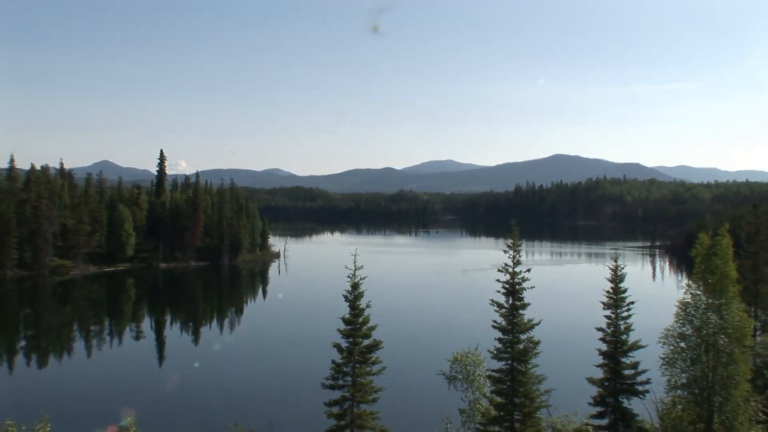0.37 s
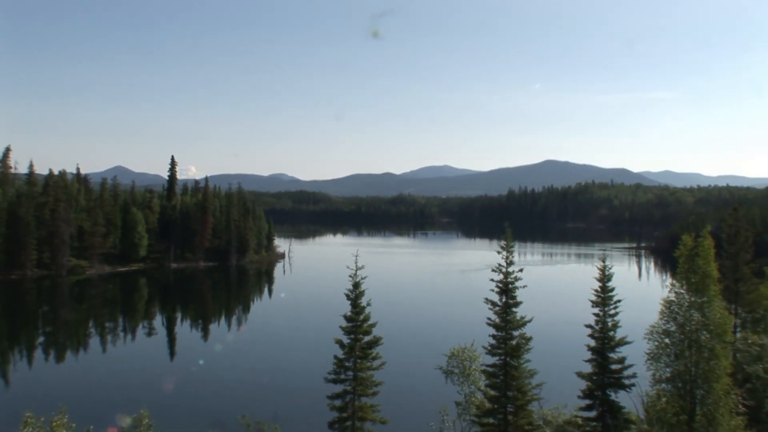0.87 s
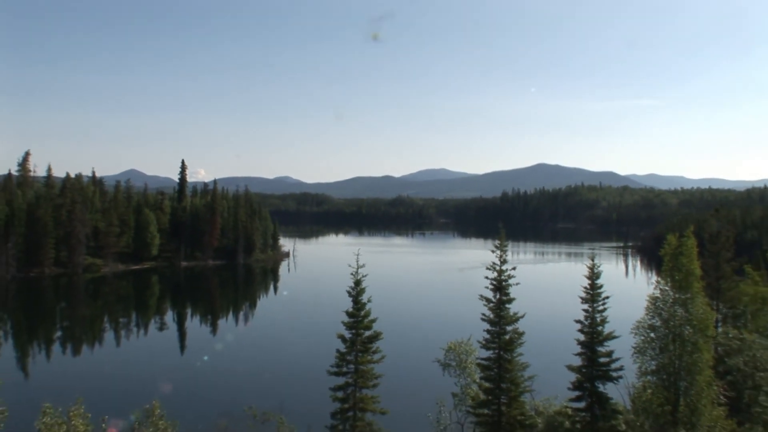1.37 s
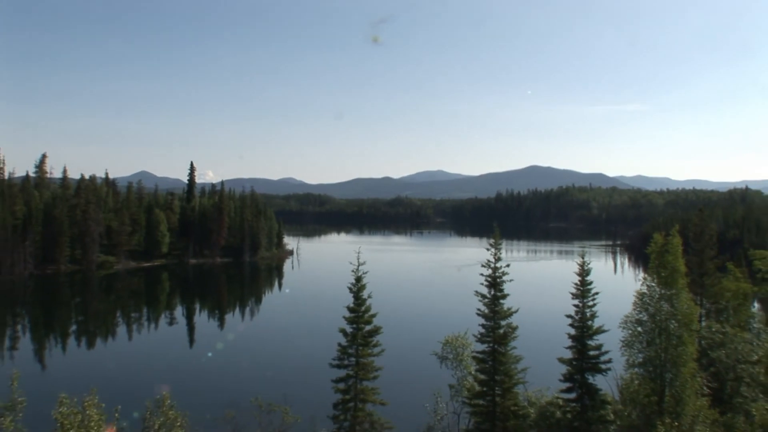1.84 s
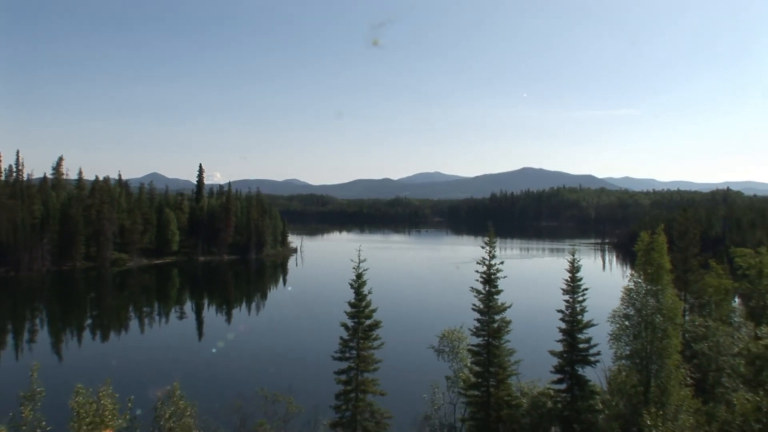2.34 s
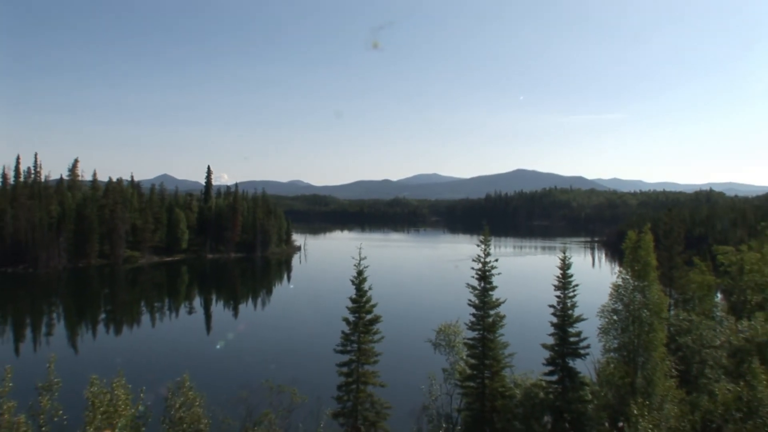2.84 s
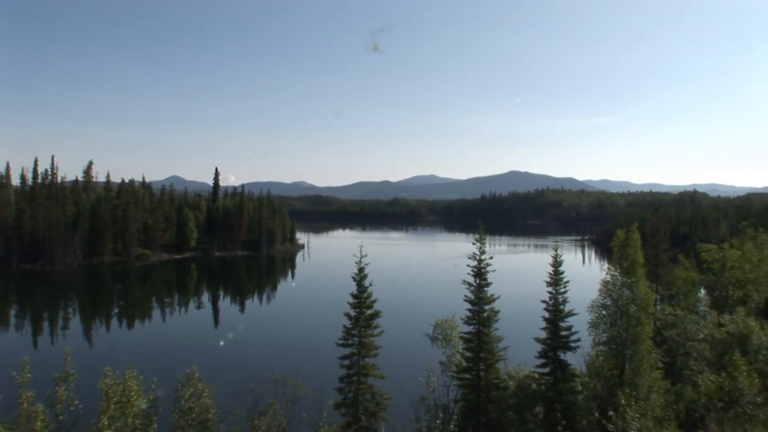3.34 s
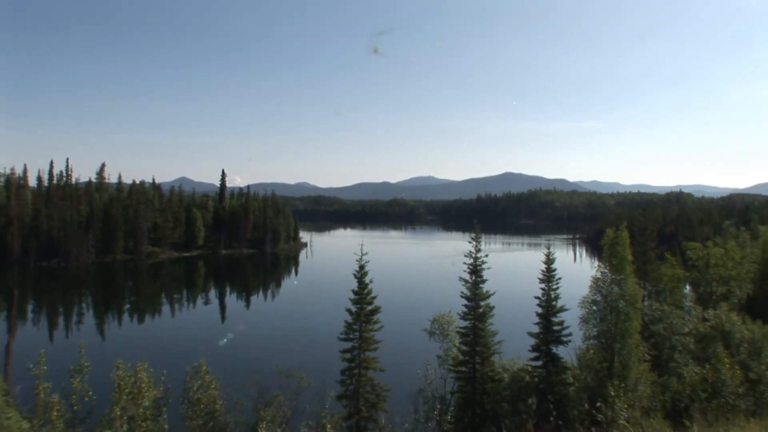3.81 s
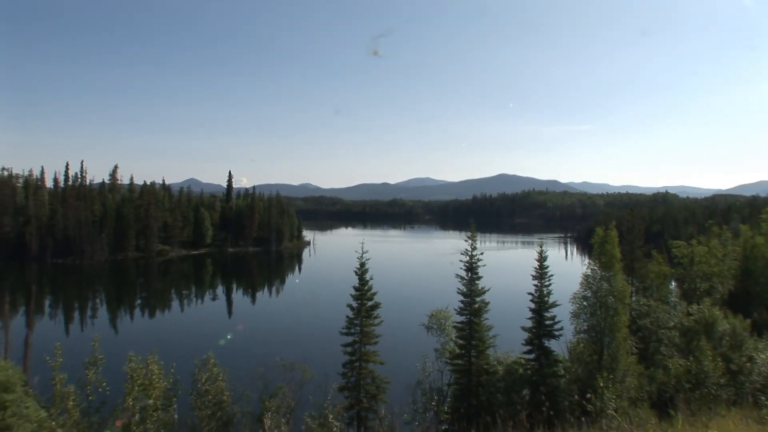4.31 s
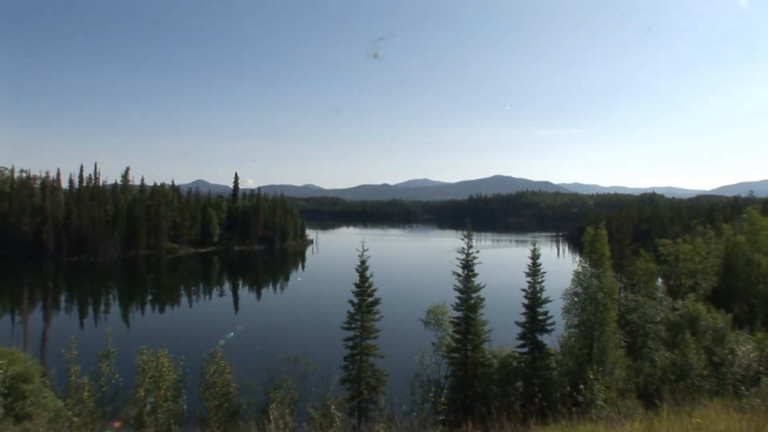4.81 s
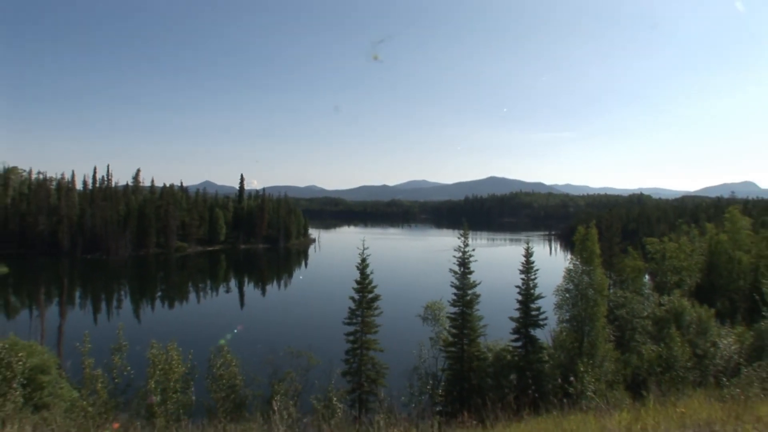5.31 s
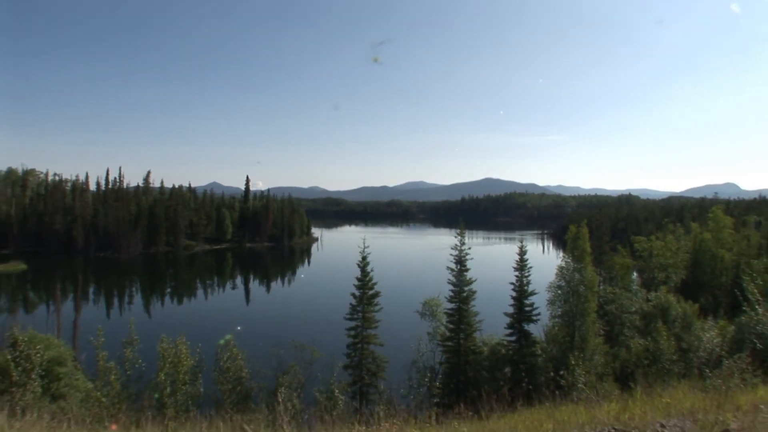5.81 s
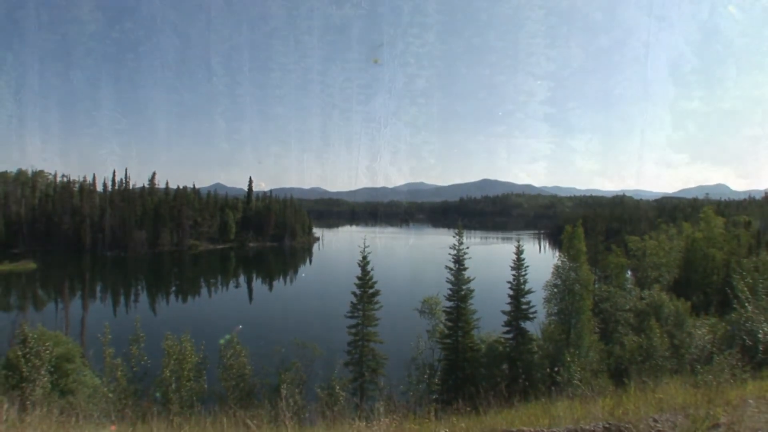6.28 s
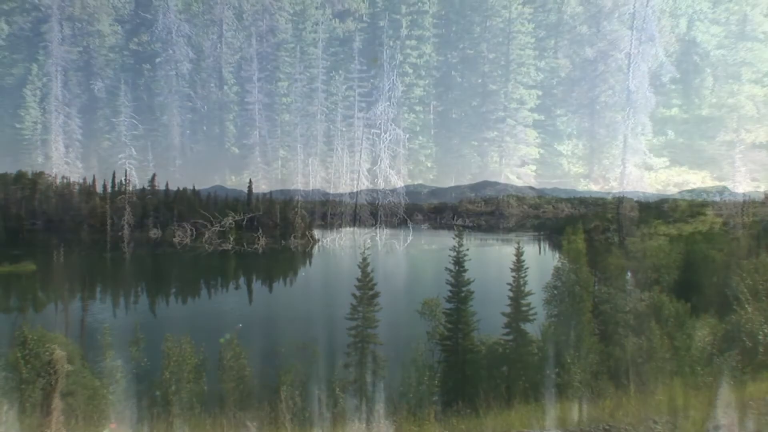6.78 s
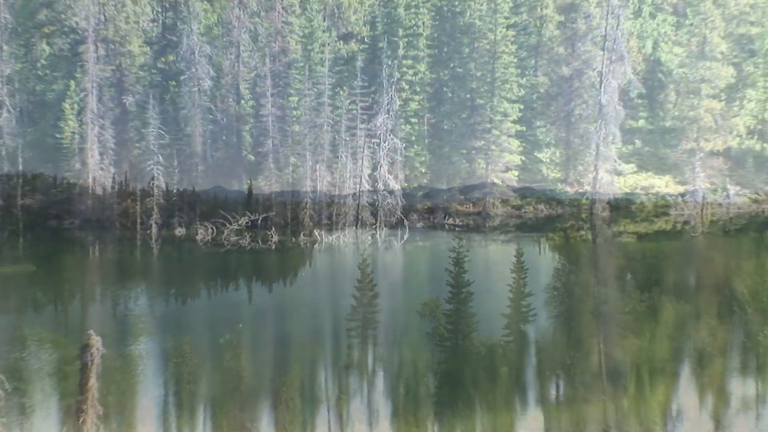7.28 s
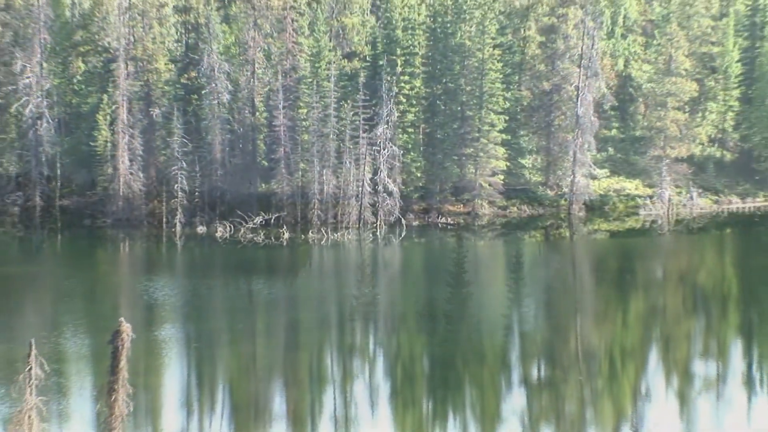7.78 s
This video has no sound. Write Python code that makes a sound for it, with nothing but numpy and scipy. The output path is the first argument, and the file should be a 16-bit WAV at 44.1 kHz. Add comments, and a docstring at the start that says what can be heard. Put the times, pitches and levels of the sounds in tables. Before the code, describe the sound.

A car engine hums low and throbs while tyres crunch over gravel, then cuts off abruptly as songbirds, a distant cuckoo and wind carry on.

```python
"""Songbirds and a far cuckoo sing in echoing woods: gliding tones, some swung into trills and buzzes.
A car coasts over gravel: its six-cylinder engine, a sum of cycle orders, slows and throbs in the exhaust.
Stones snap under the tyres as ringing bursts, over random grit, sand and tyre roar made of shaped noise.
The car's sound is cut off abruptly; wind, a lumpy low noise, buffets the microphone and the birds sing on."""
import sys
import numpy as np
from scipy import signal
from scipy.fft import rfft, irfft, next_fast_len
from scipy.io import wavfile
from scipy.ndimage import uniform_filter1d, map_coordinates

SR = 44100
rng = np.random.default_rng(int(sys.argv[2]) if len(sys.argv) > 2 else 0)


def log_audio(samples):
    """Write samples as a 16-bit WAV file to the path given in sys.argv[1]."""
    # one column per channel
    frames = np.atleast_2d(samples).T
    # limit to full scale, then quantise
    limited = np.clip(frames, -1, 1)
    pcm = np.round(limited * 32767).astype(np.int16)
    wavfile.write(sys.argv[1], SR, pcm)


def voltage_ratio(decibels):
    """Convert decibels (scalar or array-like) to amplitude ratios, 20 dB per decade."""
    exponent = np.asarray(decibels, float) / 20
    return 10 ** exponent


N = 347949
SAMPLES_S = np.arange(N) / SR
TOP_HZ = 14450

# Wind buffet spectrum: frequency_hz, relative_db
BUFFET_SPECTRUM = [(6, -35), (12, -2), (30, -8.5), (60, -7), (120, -26), (300, -39.5), (600, -65)]
# Gust peaks: peak_s, level_db
GUSTS = [(1.15, -37), (3.5, -29), (3.78, -26), (3.97, -26.5), (4.79, -21), (5.34, -24.5), (5.82, -22),
         (6.4, -24), (6.65, -21), (6.87, -22), (7.03, -24), (7.25, -30), (7.85, -27)]
BREEZE_DB = -38.5  # buffeting between gusts
GUST_RISE_DB_PER_S, GUST_FALL_DB_PER_S = 49, 47
# Outdoor hiss spectrum: frequency_hz, relative_db
HISS_SPECTRUM = [(53, -33), (90, -3), (174, -11.5), (358, -13.5), (911, -17.5), (1450, -21.5), (2520, -27),
                 (3060, -25.5), (4030, -32), (5540, -31), (12900, -35.5), (14400, -42)]

# Engine speed: time_s, cycles_per_s
ENGINE_SPEED = [(0.0, 11.98), (0.7, 11.579), (1.4, 11.275), (2.1, 11.05), (2.8, 10.832), (3.5, 10.574),
                (4.2, 10.328), (4.9, 10.12), (5.6, 9.871), (6.3, 9.492), (7.13, 8.998)]
# Engine levels: time_s, firing_tone_db, exhaust_throb_gain_db
ENGINE_LEVELS = [(0, -24, -35), (2.12, -23, -34.5), (3.2, -26, -33.5), (3.5, -27, -33.5), (5.7, -28.5, -32),
                 (7.12, -30.5, -30)]
# Cylinder unevenness, last value holding above: order_of_cycle, relative_db
CYLINDER_UNEVENNESS = [(13, -25), (14, -2.5), (15, 1.5), (16, -2), (17, -10.5), (18, -9.5), (20, -12.5),
                       (22, -8)]
# Exhaust resonances: centre_hz, width_hz, gain_db
EXHAUST_MODES = [(153, 13, 4), (245, 20, -10), (365, 18, -22)]
# Octave of the firing tone
OCTAVE_DB, OCTAVE_FADE_DB_PER_S, OCTAVE_LEAST_DB = -26.5, 3.5, -47.5
RASP_DB_PER_CYCLE = 3  # upper orders grow with each cycle per second above ten
CAR_END_S = 7.125

# Sand sprays: peak_s, level_db
SPRAYS = [(.03, -49), (.62, -49), (.76, -50), (.95, -49), (1.55, -52), (1.7, -49), (2.06, -48), (2.52, -52)]
SPRAY_RISE_DB_PER_S, SPRAY_FALL_DB_PER_S = 250, 100
# Sand resonances, each pass: centre_hz, width_hz, gain_db
SAND_MODES = [(5760, 740, 0.5), (12500, 3000, 0)]

# Tyre roar spectrum: frequency_hz, relative_db
ROAR_SPECTRUM = [(30, -35), (60, 13), (150, 13), (260, 10), (420, -2.5), (750, -3.5), (1000, -1.5),
                 (1350, -2), (1700, -6.5), (3500, -14.5), (8000, -23), (12500, -22.5), (14500, -26)]
# Tyre roar, left-right likeness: frequency_hz, likeness
ROAR_LIKENESS = [(60, 0.91), (250, 0.42), (600, 0.011), (3000, 0.088)]
# Single stones: start_s, relative_level_db, relative_treble_db, left_over_right_db
STONES = [(0.0857, -36, -18, 0.5), (0.277, -34, -13, 8), (0.3546, -36, -17, 2.5), (0.3785, -33, -23, 9),
          (0.4145, -29, -29, 6), (0.4359, -27.5, -16, 9), (0.518, -29.5, -10, 8), (0.5886, -44, -17, 0.5),
          (0.669, -33, -24, 6), (0.826, -34.5, -5.5, 22), (1.081, -34, -18, 7), (1.096, -29.5, -27, 15),
          (1.1291, -24, -28, -3), (1.191, -22.5, -12, -2), (1.5229, -39, -7, 7), (1.8906, -31, -19, 10),
          (1.923, -16, -33, 0.5), (2.0281, -11, -36, -2), (2.0435, -11.5, -31, -3), (2.5085, -27, -31, 17),
          (2.522, -26.5, -31, 23), (2.5712, -31, -26, 14), (2.657, -27, -21, -2.0), (3.3454, -34, -20, -5),
          (4.0787, -34, -22, 6), (4.987, -29, -28, -0.5), (4.9924, -23, -23, -2.0), (5.012, -22, -34, -2.5),
          (5.042, -26, -31, 0), (5.0476, -15, -45, -1)]
# Dull body of a snap: centre_hz, width_hz, relative_db
SNAP_BODY_MODES = [(1300, 600, -1), (2200, 800, 0), (3200, 900, -6)]
# Bright edge of a snap: centre_hz, width_hz, relative_db
SNAP_EDGE_MODES = [(4500, 1200, 0.5), (12300, 1600, -3.5)]
# Patches of loose grit: peak_s, level_db
LOOSE_GRIT = [(0, -43), (.85, -40.5), (2, -41), (2.55, -40), (4.99, -57)]
GRIT_DB, GRIT_THIN_DB_PER_S = -55.5, 1  # small grit, less as the car slows
LOOSE_RISE_DB_PER_S, LOOSE_FALL_DB_PER_S = 58, 43
ROAR_DB = -35

# Left bird's glides: start_s, end_s, first_hz, last_hz, relative_db
LEFT_GLIDES = [ (.728, .75, 4760, 4330, -44), (.75, .812, 4300, 4210, -45.5), (.814, .864, 4100, 3510, -43),
               (.864, .9, 3470, 3720, -46), (.978, 1.0, 4000, 3190, -40), (1.0, 1.08, 3140, 3030, -44),
               (1.112, 1.16, 3420, 3110, -36), (1.16, 1.235, 3100, 3080, -42),
               (1.243, 1.272, 3900, 3186, -34), (1.272, 1.33, 3180, 3550, -35.5),
               (1.33, 1.39, 3540, 3553, -40), (1.515, 1.55, 2850, 2980, -47),
               (1.55, 1.65, 2980, 2750, -41.5), (1.705, 1.73, 3000, 2520, -40),
               (1.868, 1.92, 2620, 3130, -39), (1.92, 1.955, 3120, 3200, -40.5),
               (1.955, 2.02, 3190, 2990, -40), (2.303, 2.322, 2650, 2760, -40),
               (2.7, 2.735, 3150, 2900, -48), (2.752, 2.775, 2930, 2350, -44.5)]
# Glides of the birds ahead: start_s, end_s, first_hz, last_hz, relative_db
AHEAD_GLIDES = [ (2.06, 2.19, 2160, 2175, -46), (2.207, 2.245, 2850, 2100, -35),
                (2.263, 2.329, 2110, 2274, -36), (2.44, 2.474, 2660, 2500, -40),
                (2.474, 2.515, 2500, 2680, -33), (2.515, 2.565, 2680, 2430, -35),
                (2.59, 2.67, 3370, 3430, -43), (2.67, 2.7, 3410, 3150, -41.5),
                (2.873, 2.9, 2650, 2450, -40), (2.9, 2.945, 2480, 2590, -39.5),
                (2.945, 2.967, 2540, 2930, -36), (2.993, 3.02, 3070, 2680, -40),
                (3.02, 3.063, 2700, 2574, -36), (3.063, 3.1, 2590, 3030, -43),
                (3.1, 3.145, 3100, 2440, -43), (4.045, 4.072, 2180, 2210, -40),
                (4.072, 4.087, 2210, 2040, -42), (4.159, 4.197, 2680, 3100, -38),
                (4.205, 4.23, 3050, 2630, -40), (4.335, 4.392, 2380, 2516, -35),
                (4.518, 4.546, 2510, 2100, -39.5), (4.622, 4.65, 2720, 3150, -35),
                (4.663, 4.686, 3200, 2680, -36), (4.8, 4.885, 2400, 2620, -37),
                (5.36, 5.446, 2610, 2430, -53), (5.62, 5.66, 6300, 5240, -52),
                (5.446, 5.5, 2430, 2266, -40.5), (5.5, 5.655, 2247, 2170, -38),
                (5.655, 5.685, 2450, 2200, -38), (5.757, 5.781, 2180, 2410, -45),
                (5.781, 5.86, 2300, 2180, -38.5), (5.87, 5.935, 2250, 2840, -35),
                (5.935, 6.026, 2840, 2730, -38), (5.845, 5.89, 3350, 3260, -44),
                (5.931, 5.96, 3500, 3300, -41), (5.96, 6.02, 3400, 3650, -42),
                (6.028, 6.06, 2730, 2520, -40), (6.062, 6.125, 2860, 2526, -35.5),
                (6.125, 6.17, 2517, 2480, -30.5), (6.17, 6.21, 2490, 2400, -36),
                (6.095, 6.115, 3300, 3270, -40), (6.146, 6.258, 2906, 2950, -40.5),
                (6.252, 6.286, 2600, 2440, -46), (6.286, 6.318, 2480, 2810, -34.5),
                (6.385, 6.413, 2650, 2270, -37), (6.415, 6.493, 2240, 2125, -37),
                (6.699, 6.745, 4060, 4550, -43.5), (6.858, 6.898, 4630, 4240, -43.5),
                (7.092, 7.118, 4200, 4500, -45), (7.148, 7.165, 4020, 4400, -47),
                (7.2, 7.269, 4060, 3850, -47), (7.236, 7.255, 5300, 5000, -44),
                (7.255, 7.283, 5000, 4150, -37.5), (7.355, 7.395, 3420, 4000, -43),
                (7.395, 7.478, 3980, 4230, -37.5), (7.425, 7.447, 7600, 7150, -48),
                (7.447, 7.465, 7150, 6500, -40), (7.637, 7.65, 3770, 4600, -38),
                (7.65, 7.66, 4680, 3520, -41), (7.682, 7.708, 3330, 4400, -39),
                (7.708, 7.736, 4320, 4980, -30), (7.868, 7.89, 5200, 4900, -52)]
# Right bird's glides: start_s, end_s, first_hz, last_hz, relative_db
RIGHT_GLIDES = [ (5.472, 5.62, 2950, 2720, -41), (5.625, 5.7, 2910, 2690, -40.5),
                (5.7, 5.775, 2700, 2590, -41.5), (5.893, 5.933, 2310, 2220, -40),
                (5.895, 5.925, 2980, 2890, -40), (6.11, 6.15, 2550, 2320, -39),
                (6.15, 6.21, 2320, 2230, -34), (6.334, 6.405, 2654, 2654, -37),
                (6.405, 6.45, 2667, 2515, -32.5), (6.45, 6.565, 2530, 2468, -30),
                (6.64, 6.69, 2680, 2580, -41), (6.69, 6.71, 2570, 2800, -34),
                (6.672, 6.715, 3000, 2826, -38), (6.715, 6.82, 2815, 2697, -33),
                (6.934, 7.04, 3105, 2760, -37.5), (7.04, 7.064, 2750, 2840, -34.5),
                (7.074, 7.108, 2920, 2550, -40), (7.108, 7.17, 2590, 2590, -40),
                (7.17, 7.26, 2590, 2600, -47), (7.271, 7.37, 2600, 2235, -37),
                (7.385, 7.455, 2240, 2255, -47), (7.57, 7.615, 2620, 2370, -50),
                (7.615, 7.704, 2360, 2180, -40), (7.671, 7.745, 2630, 2280, -34),
                (7.68, 7.718, 2930, 2660, -38), (7.718, 7.85, 2630, 2620, -40)]
BEND = 1.6  # above 1 a glide moves fast first, then settles
PEAK_SHARE = 0.44  # loudest point as a share of the glide
# Drop below the peak at start, at end, and at an end slurred to a neighbour
ONSET_DB, FADE_DB, SLUR_DB = 6, 6.5, 2
# Buzzy notes: start_s, end_s, first_hz, last_hz, relative_db
BUZZ_NOTES = [(1.72, 1.892, 3140, 3510, -40.5), (2.41, 2.488, 3610, 3420, -38.5),
              (2.486, 2.629, 3570, 3250, -43)]
# Faint hoarse notes: start_s, end_s, first_hz, last_hz, relative_db
HUSKY_NOTES = [(.94, .99, 6150, 6050, -43), (1.47, 1.53, 5250, 5150, -51), (2.065, 2.13, 4600, 4600, -42),
               (2.13, 2.32, 4580, 4550, -53)]
# Chirrs: start_s, end_s, first_hz, last_hz, relative_db
CHIRR_NOTES = [(7.457, 7.481, 4900, 4800, -27), (7.553, 7.592, 6060, 4600, -32),
               (7.811, 7.862, 6340, 4400, -34.5)]
# Warbled glides: start_s, end_s, first_hz, last_hz, relative_db
TRILL_NOTES = [(4.228, 4.348, 2447, 2327, -32.5), (4.686, 4.806, 2466, 2320, -33)]
# A small bird's short arches: top_s, top_hz, relative_db
CHIP_TOPS = [(4.142, 2550, -50), (4.155, 2500, -38), (4.605, 2650, -52), (4.62, 2600, -43),
             (5.31, 4900, -46), (5.333, 4650, -48), (5.375, 4300, -44), (5.4, 4050, -46), (5.42, 4050, -48),
             (5.563, 4300, -37.5), (5.59, 4250, -46), (5.643, 5000, -41), (5.66, 4750, -44),
             (5.68, 4600, -40), (5.7, 4400, -40), (5.718, 4250, -47), (5.738, 4050, -41),
             (5.862, 4200, -43), (5.878, 4300, -37), (5.927, 4880, -36), (5.945, 4680, -35.5),
             (5.964, 4560, -35.5), (5.985, 4000, -37), (6.072, 4000, -43), (6.092, 7350, -44),
             (6.186, 4750, -30), (6.206, 4560, -29.5), (6.226, 4380, -34), (6.256, 4350, -46),
             (6.31, 6500, -48), (6.415, 6600, -50), (6.5, 6050, -48), (6.57, 6050, -46)]
CHIP_RISE_S, CHIP_FALL_S, CHIP_EDGE_DB = .009, .009, 11
CHIP_FROM, CHIP_TO = .96, .94  # end pitches as shares of the top
# Cuckoo calls: start_s, first_note_relative_db, second_note_relative_db, second_note_length_s
CUCKOO_CALLS = [(3.328, -30, -34.5, .3), (5.775, -28, -35, .2), (7.543, -26.5, -38, .2)]
# Cuckoo's first note, wavering twice: time_in_call_s, pitch_hz, relative_db
CUCKOO_FIRST_NOTE = [(0, 660, -16), (.02, 847, 1.5), (.055, 688, -6), (.075, 841, 1), (.095, 760, -5.5),
                     (.125, 793, -18)]
COO_AFTER_S, COO_HZ, COO_SAG_HZ, COO_FADE_DB = .31, 619, 12, 6  # second note
# Far small birds: time_s, gain_db
TWITTER_GAIN = [(5, -63), (5.45, -57.5), (6.0, -50.5), (6.4, -51), (6.7, -54), (6.95, -59.5), (7.3, -59.5),
                (7.89, -69)]
# Echo decay in the woods: frequency_hz, t60_s
WOODS_DECAY = [(600, 0.59), (2500, 0.98), (5000, 0.28), (9000, 0.64)]


def unit(x):
    """Scaled to rms 1."""
    return x / np.sqrt(np.mean(x ** 2) + 1e-20)


def along(points, hz):
    """(Hz, value) points interpolated on a log axis."""
    f, v = np.transpose(points)
    return np.interp(np.log(hz + 1), np.log(f + 1), v)


def curves(rows):
    """One value per sample for each column after the time."""
    s, *cols = np.transpose(rows)
    return [np.interp(SAMPLES_S, s, c) for c in cols]


def peaks(rows, rise_db_per_s, fall_db_per_s, base_db):
    """Level in dB that climbs to each peak and sinks again at fixed slopes."""
    level_db = base_db + 0 * SAMPLES_S
    for s, db in rows:
        drop_db = np.maximum(rise_db_per_s * (s - SAMPLES_S), fall_db_per_s * (SAMPLES_S - s))
        level_db = np.maximum(level_db, db - drop_db)
    return level_db


def wobble(knots_per_s):
    """Smooth random curve."""
    knots = rng.standard_normal(int(N * knots_per_s / SR) + 4)
    return map_coordinates(knots, [SAMPLES_S * knots_per_s])


def filtered(x, response):
    """x times a complex response of frequency."""
    m = next_fast_len(N + SR // 2)
    return irfft(rfft(x, m) * response(np.fft.rfftfreq(m, 1 / SR)), m)[..., :N]


def resonant(modes, f):
    """Causal response of a few resonances, signs alternating."""
    total = 0
    for k, (centre, width, db) in enumerate(modes):
        total = total + (-1) ** k * voltage_ratio(db) * 1j * f * width / (centre * centre - f * f + 1j * f * width)
    return total


def rush(spectrum, alike, patchy_db):
    """Stereo noise of rms 1 with patches of random gain."""
    z = signal.stft(rng.standard_normal((2, N)), nperseg=512)[2]
    field = uniform_filter1d(rng.standard_normal(z.shape[1:]), size=6, axis=0)
    field = uniform_filter1d(field, size=10, axis=1)
    pair = signal.istft(z * voltage_ratio(patchy_db * unit(field)), nperseg=512)[1][:, :N]

    def response(hz):
        turn = np.arccos(np.clip(along(alike, hz), -1, 1)) / 2
        return voltage_ratio(along(spectrum, hz)) * [np.cos(turn), np.sin(turn)]

    mid, side = filtered(pair, response)
    return unit(np.array([mid + side, mid - side]))


def placed(x, left_db, lead_rad):
    """Point source: level difference and phase lead of the left side."""
    analytic = signal.hilbert(x, next_fast_len(N))[:N]
    gain = voltage_ratio([[left_db / 2], [-left_db / 2]])
    phase = np.exp([[.5j * lead_rad], [-.5j * lead_rad]])
    return np.real(analytic * gain * phase)


def wind():
    """Lumpy low buffeting at the microphone over a steady outdoor hiss."""
    low = rush(BUFFET_SPECTRUM, [(20, .8), (150, .5)], patchy_db=.3)
    buffet = unit(voltage_ratio(2.5 * wobble(9)) * low)
    gust_db = peaks(GUSTS, GUST_RISE_DB_PER_S, GUST_FALL_DB_PER_S, BREEZE_DB)
    hiss = rush(HISS_SPECTRUM, [(200, 0.017), (3000, 0.088), (9000, 0.017)], patchy_db=2.33)
    return voltage_ratio(gust_db) * buffet + voltage_ratio(-40) * voltage_ratio([[.6], [-.6]]) * hiss


def engine():
    """Six firings a cycle hum; uneven cylinders add orders that the exhaust rings into one throb a cycle."""
    firing_db, throb_db = curves(ENGINE_LEVELS)
    octave_db = np.maximum(OCTAVE_DB - OCTAVE_FADE_DB_PER_S * SAMPLES_S, OCTAVE_LEAST_DB)
    rate = curves(ENGINE_SPEED)[0]
    turn = 2 * np.pi * np.cumsum(rate) / SR
    firing = voltage_ratio(firing_db + .6 * wobble(6)) * np.cos(6 * turn - 1.1)
    firing += voltage_ratio(octave_db) * np.cos(12 * turn - 2.3)
    kick = np.exp(1j * (turn - 2.9))  # once a cycle
    throb = np.zeros(N)
    for k in range(13, 40):
        upper = k > 17
        order_db = np.interp(k, *np.transpose(CYLINDER_UNEVENNESS)) + (.5 + 2 * upper) * wobble(1.5)
        order_db = order_db + RASP_DB_PER_CYCLE * upper * (rate - 10)
        slip = np.exp(2j * np.pi * rng.random() * upper)  # high orders lose step with the kick
        throb += np.real(voltage_ratio(order_db) * resonant(EXHAUST_MODES, k * rate) * slip * kick ** k)
    return np.sqrt(2) * (placed(firing, 0.81, 0) + placed(voltage_ratio(throb_db) * throb, 1.7, 0))


def sprays():
    """Short bright hisses of fine sand thrown up by the tyres, more to the left."""
    noise = rng.standard_normal((2, N))
    hiss = unit(filtered(noise, lambda hz: resonant(SAND_MODES, hz) ** 2))
    level_db = peaks(SPRAYS, SPRAY_RISE_DB_PER_S, SPRAY_FALL_DB_PER_S, -90) + 3.4 * wobble(40)
    return voltage_ratio(level_db) * voltage_ratio([[2.5], [-2.5]]) * hiss


def snap(treble_db):
    """One stone: a sharp crack and a few ms of rattle ring a dull body and a brighter edge."""
    t = np.arange(SR // 40) / SR
    hz = np.fft.rfftfreq(2 * len(t), 1 / SR)
    burst = rng.standard_normal((2, len(t))) * voltage_ratio(-60 * t / [[.022], [.012]])  # t60 s: body, edge
    burst[:, 0] += 4  # crack
    responses = [resonant(SNAP_BODY_MODES, hz), resonant(SNAP_EDGE_MODES, hz)]
    body, edge = irfft(rfft(burst, 2 * len(t)) * responses)[:, :len(t)]
    return body / abs(body).max() + voltage_ratio(treble_db + 10.0) * edge / abs(edge).max()


def gravel():
    """Loud stones snap singly over a random crunch of grit and the roar of the tyres."""
    stones = np.zeros((2, N + SR))
    for s, db, treble_db, left_db in STONES:
        crack = snap(treble_db)
        gain = voltage_ratio(db + 0.5) * voltage_ratio([[left_db / 2], [-left_db / 2]])
        stones[:, round(s * SR) - 20:][:, :len(crack)] += crack * gain
    hits = (rng.random((2, N)) < 250 / SR) * rng.standard_normal((2, N))  # about 250 a second each side
    hits *= voltage_ratio(2.5 * np.minimum(rng.exponential(size=(2, N)), 3))
    grit = unit(signal.fftconvolve(hits + 0.38 * hits[::-1], snap(-20.5)[None], axes=1)[:, :N])
    base_db = GRIT_DB - GRIT_THIN_DB_PER_S * SAMPLES_S
    grit_db = peaks(LOOSE_GRIT, LOOSE_RISE_DB_PER_S, LOOSE_FALL_DB_PER_S, base_db) + 0.84 * wobble(4.56)
    roar = voltage_ratio(ROAR_DB + .7 * wobble(3)) * rush(ROAR_SPECTRUM, ROAR_LIKENESS, patchy_db=1.2)
    return stones[:, :N] + voltage_ratio(grit_db) * grit + roar


def car():
    """Engine, gravel and sand, cut off abruptly."""
    return (engine() + gravel() + sprays()) * np.clip((CAR_END_S - SAMPLES_S) / .002, 0, 1)


def whistle(notes, overtone_db, flutter_db):
    """Pure gliding tones with soft ends, a weak second harmonic and a fluttering level."""
    out = np.zeros(N + SR)
    flutter = np.sqrt(2) * voltage_ratio(flutter_db * wobble(70))
    for note in notes:
        s, hz, db = np.transpose(note)
        t = np.arange(s[0] - .004, s[-1] + 0.0012, 1 / SR)
        turn = 2 * np.pi * np.cumsum(np.interp(t, s, hz)) / SR
        ends = np.clip(np.minimum(t - t[0], t[-1] - t) / 0.002, 0, 1)
        tone = np.sin(turn) + voltage_ratio(overtone_db) * np.sin(2 * turn)
        out[round(t[0] * SR):][:len(t)] += voltage_ratio(np.interp(t, s, db)) * ends * tone
    return out[:N] * flutter


def glides(rows):
    """Every glide shares one pitch bend and one swell; glides that meet are slurred."""
    u = np.linspace(0, 1, 9)
    meet = abs(np.subtract.outer(*np.transpose(rows)[:2])) < .006
    onset_db = np.where(meet.any(axis=1), SLUR_DB, ONSET_DB)
    fade_db = np.where(meet.any(axis=0), SLUR_DB, FADE_DB)
    notes = []
    for (start, end, first_hz, last_hz, db), up_db, down_db in zip(rows, onset_db, fade_db):
        hz = last_hz + (first_hz - last_hz) * (1 - u) ** BEND
        drop_db = np.maximum(up_db * (1 - u / PEAK_SHARE), down_db * (u - PEAK_SHARE) / (1 - PEAK_SHARE))
        notes.append(np.transpose([start + (end - start) * u, hz, db - drop_db]))
    return notes


def buzzes(rows, swing_hz, swings_per_s, rising, wander_hz, rough_db):
    """Gliding tone swung up and down; rising is the share of each swing spent going up."""
    out = np.zeros(N)
    for start, end, first_hz, last_hz, db in rows:
        u = np.clip((SAMPLES_S - start) / (end - start), 0, 1)
        swing = signal.sawtooth(2 * np.pi * swings_per_s * (SAMPLES_S - start), rising)
        hz = first_hz + (last_hz - first_hz) * u + swing_hz * swing + wander_hz * wobble(160)
        level = voltage_ratio(db + rough_db * wobble(150)) * np.sin(np.pi * u) ** 0.35
        out += level * np.sin(2 * np.pi * np.cumsum(hz) / SR)
    return out


def chips():
    """Each chip's pitch jumps up to its top and drops again."""
    return [[(s - CHIP_RISE_S, hz * CHIP_FROM, db - CHIP_EDGE_DB),
             (s, hz, db),
             (s + CHIP_FALL_S, hz * CHIP_TO, db - CHIP_EDGE_DB)] for s, hz, db in CHIP_TOPS]


def cuckoo_calls():
    """A high wavering note, then a lower, nearly steady one."""
    high = [np.add(CUCKOO_FIRST_NOTE, [s, 0, db]) for s, db, *_ in CUCKOO_CALLS]
    low = [[(s + COO_AFTER_S, COO_HZ, db),
            (s + COO_AFTER_S + length, COO_HZ - COO_SAG_HZ, db - COO_FADE_DB)]
           for s, _, db, length in CUCKOO_CALLS]
    return high + low


def twitter(count):
    """Many short fluttering chips, mostly near 4 kHz, each a small arch that ends falling."""
    # start s, top Hz, fall as a share of the top, dB
    draw = rng.random((count, 4)) ** [1, 2.5, 1, 1] * [2.9, 2200, .2, 12] + [5, 3500, .02, -6]
    notes = [[(s, hz * .95, db - 7), (s + .008, hz, db), (s + .02, hz * (1 - fall), db - 7)]
             for s, hz, fall, db in draw]
    gain_db = curves(TWITTER_GAIN)[0] + 1.1 * wobble(150)
    return voltage_ratio(gain_db) * whistle(notes, overtone_db=-40, flutter_db=1)


def woods(x):
    """Scattered echoes off the trunks, a new pattern every half second, decay varying with frequency."""
    out, step = np.zeros((2, N + 2 * SR)), SR // 2
    for start in range(0, N, step):
        hz, t, z = signal.stft(rng.standard_normal((2, SR)), SR, nperseg=256)
        decay = voltage_ratio(-60 * t / along(WOODS_DECAY, hz)[:, None])
        tail = signal.istft(z * decay, SR, nperseg=256)[1]
        wet = signal.fftconvolve(x[:, start:start + step], tail / np.linalg.norm(tail[0]), axes=1)
        out[:, start + 400:][:, :wet.shape[1]] += wet
    return out[:, :N]


def birds():
    """Singers placed by level and phase between the sides; all share the echoes."""
    left = voltage_ratio(3.5) * whistle(glides(LEFT_GLIDES), overtone_db=-46, flutter_db=3.5)
    left += buzzes(BUZZ_NOTES, swing_hz=250, swings_per_s=130, rising=0.54, wander_hz=120, rough_db=3.0)
    left += buzzes(HUSKY_NOTES, swing_hz=60, swings_per_s=70, rising=.45, wander_hz=69.4, rough_db=4.5)
    left += buzzes(CHIRR_NOTES, swing_hz=800, swings_per_s=170, rising=0.11, wander_hz=150, rough_db=2.6)
    left = placed(left, 5.9, -1.64)
    ahead = whistle(glides(AHEAD_GLIDES) + chips(), overtone_db=-34, flutter_db=2.0)
    ahead += buzzes(TRILL_NOTES, swing_hz=110, swings_per_s=33.5, rising=0.82, wander_hz=15, rough_db=2.0)
    right = voltage_ratio(-1.0) * whistle(glides(RIGHT_GLIDES), overtone_db=-34, flutter_db=2.0)
    song = placed(ahead, 2.5, -0.22) + placed(right, -4.5, 0.29)
    cuckoo = voltage_ratio(0.5) * whistle(cuckoo_calls(), overtone_db=-33, flutter_db=1.5)
    cuckoo = placed(cuckoo, 7.3, 3.77)
    far = placed(twitter(count=550), 4.1, 0)
    echo = woods(voltage_ratio(-5) * left + voltage_ratio(-7) * song + voltage_ratio(-8) * cuckoo + voltage_ratio(-1) * far)
    return left + song + cuckoo + far + echo


def scene():
    """The car until it is cut off, the birds and the wind throughout."""
    return wind() + car() + birds()


def roll_off(x):
    """The treble ends steeply here."""
    return signal.sosfilt(signal.butter(12, 14810, fs=SR, output="sos"), x)


def record(dry):
    """Band limit and a small constant offset."""
    mix = filtered(dry, lambda hz: hz < TOP_HZ) + 0.01
    return roll_off(mix)


dry = scene()
out = record(dry)
log_audio(out)
```